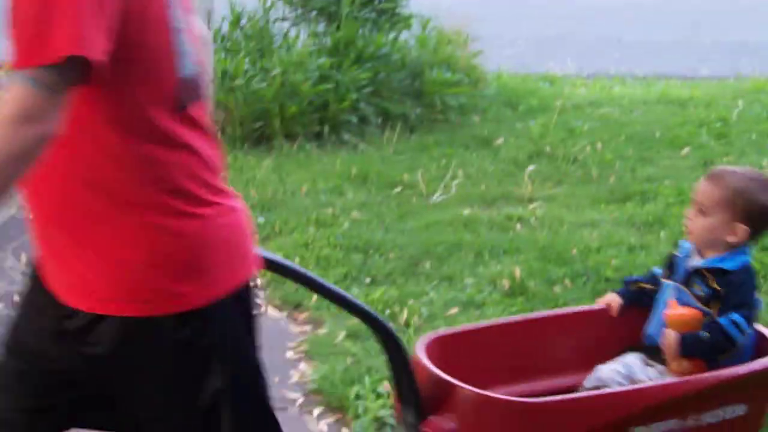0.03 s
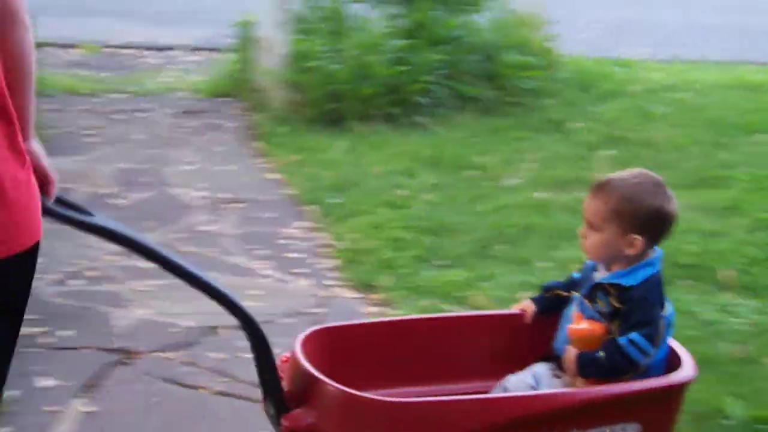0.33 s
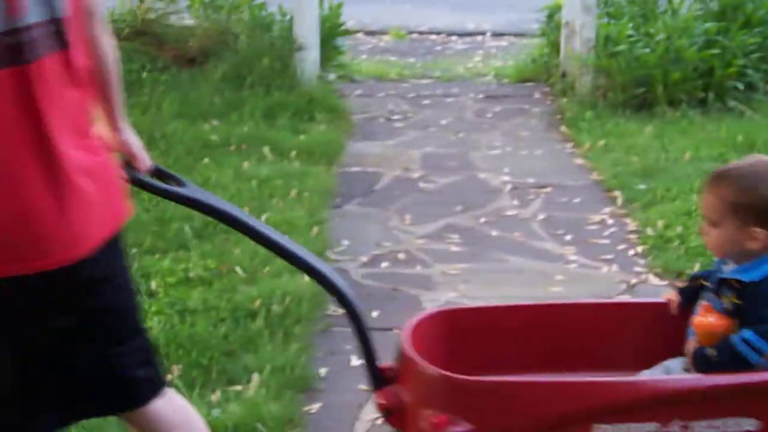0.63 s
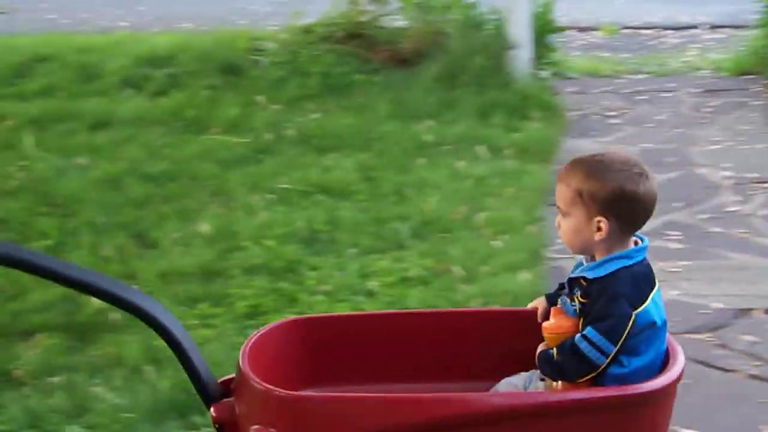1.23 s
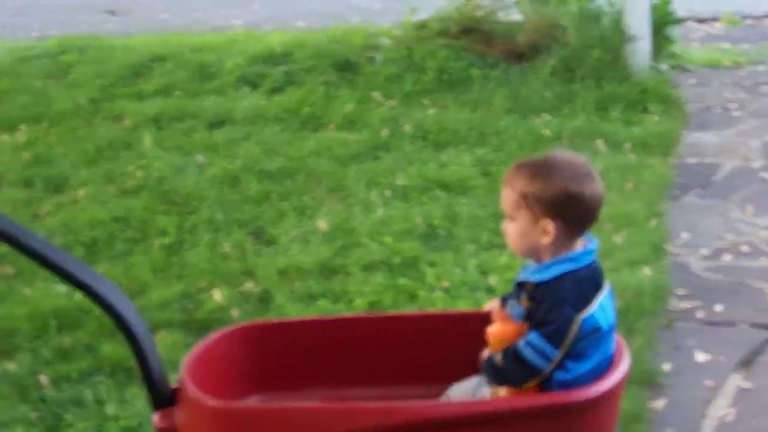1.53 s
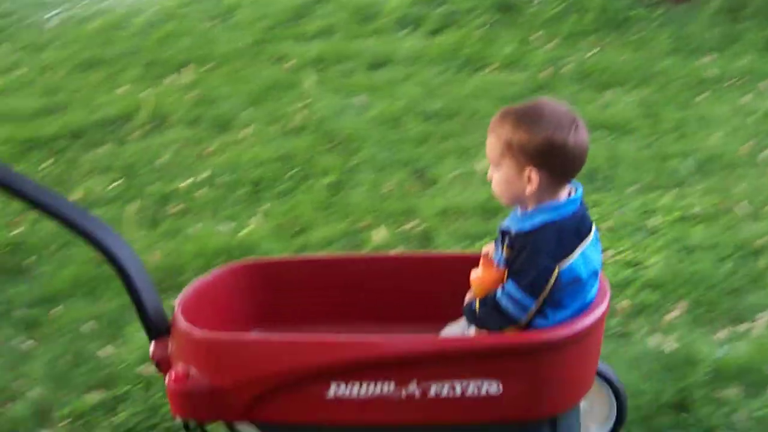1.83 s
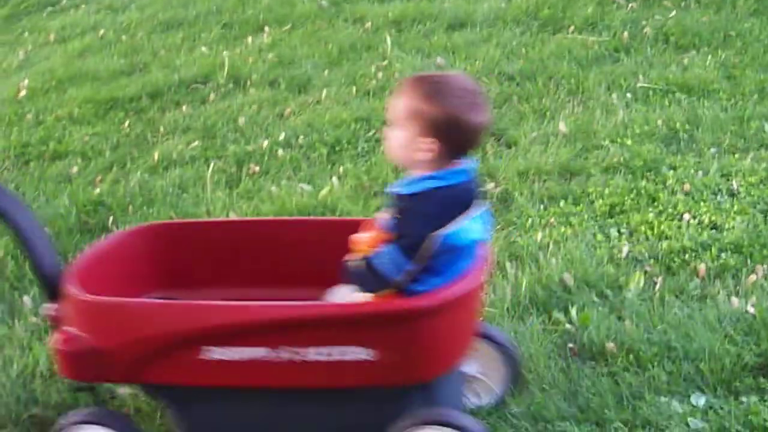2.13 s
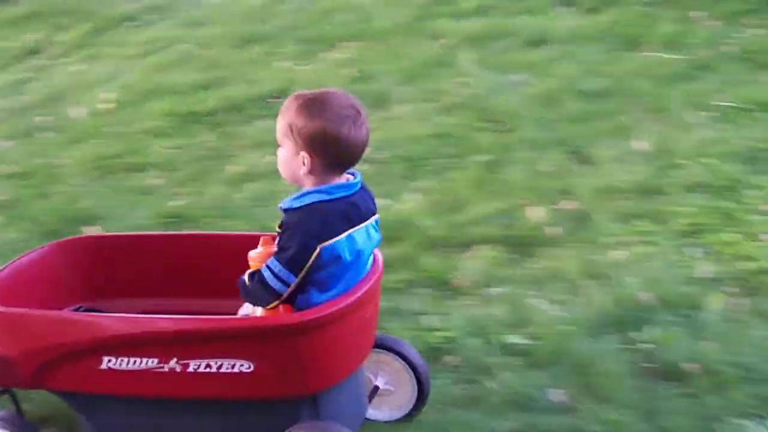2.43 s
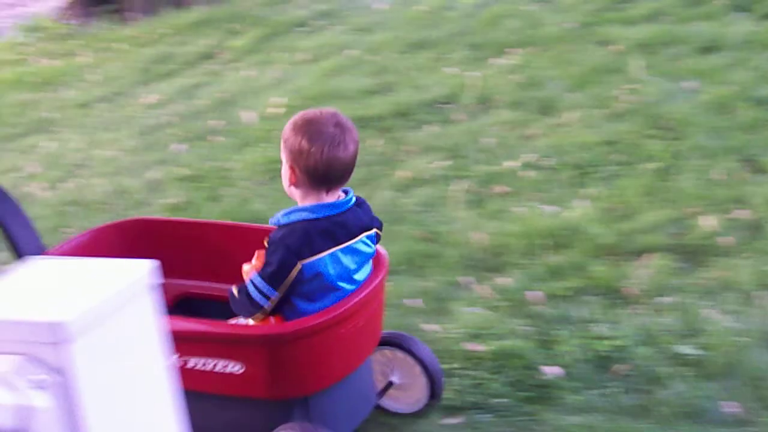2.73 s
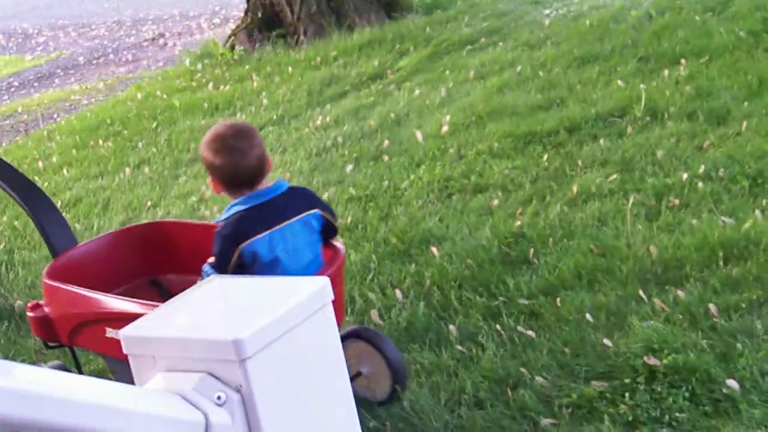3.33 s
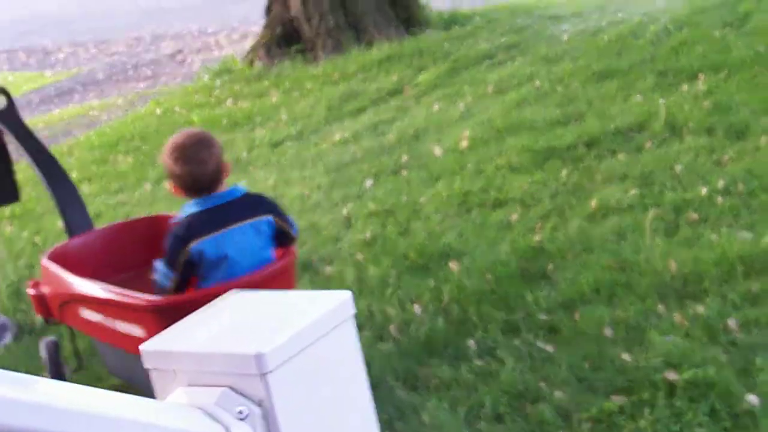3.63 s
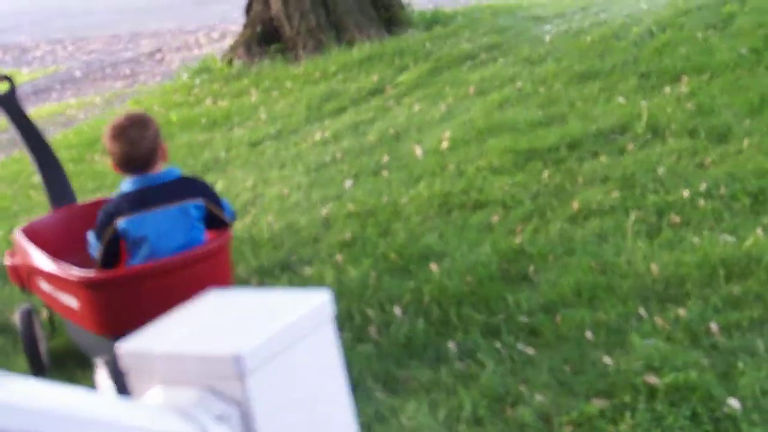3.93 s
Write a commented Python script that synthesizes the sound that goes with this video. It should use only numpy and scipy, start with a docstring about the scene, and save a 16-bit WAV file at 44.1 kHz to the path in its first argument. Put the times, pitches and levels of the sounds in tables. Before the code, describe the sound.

A plastic wagon rolls over stone and grass, rumbling, knocking and clacking.

```python
"""A plastic wagon with a child in it is pulled over flagstones, then lawn, past a near camera.
The ground jolts its wheels: the hollow tub booms and thuds, its walls rattle and knock,
loose joints clack, steel axle fittings jingle and a dry hub squeaks faintly.
Between jolts the wheels keep up a low, grainy rumble in the open air."""
import sys
import numpy as np
from scipy import signal
from scipy.fft import rfft, irfft, next_fast_len
from scipy.io import wavfile
from scipy.ndimage import uniform_filter1d, map_coordinates

SR = 44100
rng = np.random.default_rng(int(sys.argv[2]) if len(sys.argv) > 2 else 0)


def file_out(sig):
    """Save sig as 16-bit WAV at sys.argv[1]."""
    # one column per channel
    cols = np.atleast_2d(sig).T
    # limit, then scale
    lim = np.clip(cols, -1, 1)
    pcm = np.round(lim * 32767).astype(np.int16)
    wavfile.write(sys.argv[1], SR, pcm)


N = 176400

# Each row: start in seconds, length in seconds, tub, wall and joint levels in relative dB.
WHEEL_BUMPS = [(0.059,0.013,-32,-31,-53),(0.112,0.082,-26,-30,-64),(0.18,0.083,-33,-31.5,-37),(0.317,0.026,-28,-27.5,-33.5),(0.491,0.0073,-20,-32,-31.5),(0.506,0.039,-20.5,-30,-35.5),(0.564,0.026,-25.5,-31,-32.5),(0.707,0.043,-25,-32.5,-37),(0.776,0.051,-24,-35.5,-38),(0.906,0.058,-28.5,-30.5,-36),(1.07,0.072,-32.5,-39,-46),(1.356,0.078,-32.5,-38,-43.5),(1.538,0.057,-36,-39.5,-50),(1.692,0.1,-34,-39,-45.5),(1.847,0.075,-34.5,-38.5,-49),(1.905,0.062,-33,-37.5,-45),(2.02,0.076,-35.5,-44,-43),(2.271,0.035,-38,-34.5,-44),(2.429,0.026,-28,-33,-33),(2.601,0.041,-27.5,-29,-31),(2.692,0.018,-26,-34.5,-39),(2.824,0.024,-31.5,-29.5,-41),(2.872,0.032,-28,-34.5,-32),(2.929,0.027,-29,-33,-31.5),(2.98,0.025,-29.5,-30,-40),(3.153,0.053,-30.5,-37,-56),(3.441,0.05,-26.5,-32.5,-43),(3.565,0.042,-33.5,-32,-42.5),(3.844,0.04,-32.5,-39.5,-49.5)]
# Each row: time in seconds, tub, wall and joint levels in relative dB.
ROLLING_LEVELS = [(0,-26.5,-33,-34),(.3,-26.5,-33,-37.5),(.47,-30,-31.5,-40),(.62,-31.5,-36,-42),(.87,-34.5,-40.5,-49),(1.05,-34,-44,-51),(1.3,-37,-46,-52),(1.5,-37.5,-56.5,-54.5),(1.65,-43.5,-41.5,-50.5),(2.1,-38.5,-44,-56.5),(2.36,-39,-46.5,-60.5),(2.48,-33,-37,-48.5),(2.79,-40.5,-44.5,-48),(2.92,-30.5,-34,-42.5),(3.1,-34,-38.5,-44),(3.379,-36,-39.5,-47.5),(3.72,-42,-46,-57),(4,-42,-52,-58)]
def shaking(part, roll_db, bump_db, attack_s, release_s, sag_db):
    """Envelope of one part: steady rolling plus attack, sagging hold and release at each bump."""
    t = np.arange(N) / SR
    column = ("tub", "walls", "joints").index(part)
    roll = np.array(ROLLING_LEVELS)
    power = amp(np.interp(t, roll[:, 0], roll[:, 1 + column]) + roll_db) ** 2
    for start_s, length_s, *levels_db in WHEEL_BUMPS:
        age = t - start_s
        shape = np.clip(age / attack_s, 0, 1) * np.exp(-np.maximum(age - length_s, 0) / release_s)
        tilt_db = sag_db * (.5 - np.clip(age / length_s, 0, 1))
        power += (shape * amp(levels_db[column] + bump_db + tilt_db)) ** 2
    return np.sqrt(power)


# Each row: frequency in Hz, spectrum level in relative dB.
TUB_SPECTRUM = [(30,-42.5),(55,-24.5),(75,-23),(100,-9.5),(143,1),(170,-3.5),(210,-2.5),(255,-13),(295,-23.5),(450,-80.5)]
def tub_boom():
    """The hollow body booms under the knocks of the wheels."""
    hits = contacts(per_s=120, spread_db=5.9, life_s=0.0023, friction=1.0)
    boom = steadied(coloured(hits, lambda hz: along(TUB_SPECTRUM, hz)), samples=800)
    shake = shaking("tub", roll_db=-0.5, bump_db=-2, attack_s=0.0017, release_s=0.012, sag_db=0.7)
    return boom * shake * amp(1.3 * wobble(21.62))


# Each row: start in seconds, level in dB, pitch in Hz, t60 in seconds.
TUB_THUDS = [(0.196,-9,165.5,0.12),(0.509,-14.5,149.5,.27),(0.94,-23.5,199,0.063),(1.771,-20.5,191.4,0.17),(2.61,-23,221,0.23),(2.866,-15.5,142.6,0.12),(2.941,-17,196.4,0.15),(2.992,-21,210,0.13),(3.184,-16.5,159.3,0.094),(3.448,-21,159.8,0.16),(3.577,-27,248,0.143),(3.592,-20.5,154,0.15)]
# Each row: multiple of the pitch, level in relative dB.
THUD_PARTIALS = [(.72,-12.5),(1.001,0.5),(1.28,-7)]
def tub_thuds():
    """The tub drops on its axle."""
    return hollow_blows(TUB_THUDS, THUD_PARTIALS, attack_s=0.008)


# Each row: frequency in Hz, spectrum level in relative dB.
WALL_SPECTRUM = [(200,-49.5),(300,-18),(360,3),(470,1),(600,0.5),(740,1),(950,-4),(1250,-1.5),(1700,-9.5),(2400,-10.5),(4000,-61.5)]
# Each row: frequency in Hz, level in relative dB, t60 in seconds.
PLASTIC_MODES = [(423,2.5,0.031),(463,3.5,0.053),(561.5,-8,0.29),(654,5.5,0.063),(783,4.5,0.064),(866,-6,0.15),(1058,-4,0.082),(1256,-8.5,0.023),(1610,-2.5,0.031),(1770,-2.5,0.023),(2872,-4.5,0.039),(3260,-6.5,0.053)]
def wall_rattle():
    """Dense knocks rattle the plastic walls and wheels and ring their modes."""
    hits = contacts(per_s=170, spread_db=2.4, life_s=0.0032, friction=0.24)
    knocks = unit(coloured(hits, lambda hz: along(WALL_SPECTRUM, hz)))
    ring = amp(-3.5) * ringing(PLASTIC_MODES, per_mode_per_s=22, spread_db=5.2)
    shake = shaking("walls", roll_db=-1, bump_db=-1.5, attack_s=0.0013, release_s=0.025, sag_db=3.8)
    return steadied(knocks + ring, samples=1300) * shake * amp(1.6 * wobble(25.37))


# Each row: start in seconds, level in dB, pitch in Hz, t60 in seconds.
PANEL_KNOCKS = [(1.387,-31,557,.12),(1.927,-30.5,1163,0.046),(2.374,-33,1195,0.047),(2.691,-25.5,646,0.048),(2.869,-20,553,0.051),(2.934,-21.5,1234,0.064),(2.9915,-22.5,650,0.023),(3.161,-29,794,0.16),(3.4475,-27.5,1037,0.064),(3.7025,-25.5,1070,0.01)]
# Each row: multiple of the pitch, level in relative dB.
KNOCK_PARTIALS = [(.7,-2),(1,4),(1.36,1),(1.5,-10)]
def panel_knocks():
    """A hollow panel is knocked and rings briefly."""
    return hollow_blows(PANEL_KNOCKS, KNOCK_PARTIALS, attack_s=0.00066)


# Each row: start in seconds, level in relative dB, centre in Hz, crack t60 in seconds.
JOINT_CLACKS = [(0.115,-19,4800,0.011),(0.1541,-20.5,3980,0.016),(0.195,-11,5340,0.0053),(0.21,-9,4340,0.02),(0.2971,-21,2900,0.0062),(0.3427,-13,3970,0.0089),(0.4,-26.5,1530,0.034),(0.4792,-23.5,1500,0.019),(0.502,-23.5,3660,0.024),(0.563,-25,3330,0.028),(0.696,-20,3910,0.024),(0.943,-23.5,2490,0.035),(1.0413,-32.5,2700,0.0051),(1.2257,-27,2770,0.012),(1.25,-36.5,4460,0.018),(1.384,-31,2960,0.016),(1.5917,-22,2890,0.0072),(1.6677,-29,2320,0.027),(1.7591,-27,7160,0.0061),(1.9273,-29.5,6130,0.023),(2.0236,-26.5,5340,0.0079),(2.214,-34.5,2400,0.022),(2.2845,-31.5,2500,.011),(2.422,-29,1490,0.015),(2.4394,-24.5,2470,0.019),(2.629,-19.5,3110,0.01),(2.6889,-22.5,2930,0.018),(2.8511,-19.5,4110,0.024),(2.8663,-18,3290,0.017),(2.933,-19,1744,0.013),(2.991,-21.5,2300,0.0078),(3.043,-25.5,2040,0.046),(3.121,-29.5,2250,0.0064),(3.161,-26,1510,0.013),(3.2231,-29.5,1820,0.035),(3.31,-30,1330,0.025),(3.4454,-24,2430,0.019),(3.4474,-21,630,0.013),(3.5747,-25,760,0.0061)]
# Each row: frequency in Hz, spectrum level in relative dB.
CRACK_SPECTRUM = [(200,-42),(400,7),(900,4.5),(3000,4),(4800,3.5),(6300,4),(7200,-2.5),(8000,-19),(8800,-56.5)]
def joint_clacks(spot_db=14.5, spot_octaves=1.54, spot_t60_s=0.035, tail_db=-19.5, tail_t60_s=0.24):
    """A loose joint hits its stop: a crack and the plastic's modes, coloured by the spot that is hit."""
    out, t = np.zeros((2, N + SR)), np.arange(SR // 6) / SR
    for start_s, db, centre_hz, t60 in JOINT_CLACKS:
        spot = lambda hz: spot_db * np.exp(-(np.log2((hz + 1) / centre_hz) / spot_octaves) ** 2)
        shape = (amp(-60 * t / t60) + amp(tail_db - 60 * t / tail_t60_s)) * rise(t, 0.0003)
        burst = shape * rng.standard_normal((2, len(t)))
        crack = coloured(burst, lambda hz: along(CRACK_SPECTRUM, hz) + spot(hz))
        crack *= np.linalg.norm(shape) / np.linalg.norm(crack, axis=1, keepdims=True)
        ring = amp(-11.5) * struck(PLASTIC_MODES, t, spot) * rise(t, 0.00027)
        ring += amp(-7) * struck([(centre_hz, 0, spot_t60_s)], t, spot) * rise(t, 0.00069)
        out[:, int(start_s * SR):][:, :len(t)] += amp(db) * (crack + ring)
    return out[:, :N]


# Each row: frequency in Hz, spectrum level in relative dB.
JOINT_SPECTRUM = [(800,-16),(1500,-3),(2100,-0.5),(2900,4),(3700,-1),(4300,0),(4800,-4.5),(5500,5),(6200,-9.5),(7000,-4),(7600,-13.5),(8100,-36.5),(8800,-25.5)]
# Each row: frequency in Hz, level in relative dB, t60 in seconds.
STEEL_MODES = [(2710,-9.5,0.058),(3370,-12,0.059),(4010,-5.5,0.087),(4560,-3,0.027),(5300,-17,0.048),(5230,0,0.052),(5300,-2,0.034),(7300,-6,0.076)]
def joint_chatter():
    """Hubs and handle chatter, and the steel fittings jingle with them."""
    hits = contacts(per_s=180, spread_db=5.7, life_s=0.0017, friction=0.49)
    chatter = steadied(coloured(hits, lambda hz: along(JOINT_SPECTRUM, hz)), samples=1500)
    jingle = steadied(ringing(STEEL_MODES, per_mode_per_s=17, spread_db=1.6), samples=5000)
    shake = shaking("joints", roll_db=0, bump_db=-2, attack_s=0.0032, release_s=0.019, sag_db=2.1)
    return (patchy(chatter, depth_db=4.0) + amp(-9) * jingle) * shake


# Each row: start in seconds, level in relative dB.
WASHER_PINGS = [(0.113,-28),(0.183,-28),(0.272,-31),(0.49,-31),(0.748,-26),(1.755,-37),(2.062,-37),(2.098,-30),(2.615,-31),(2.819,-37),(3.16,-38),(3.876,-41)]
def washer_pings(pitch_hz=5400, t60_s=0.11):
    """A washer rings now and then on one slightly unsteady tone."""
    t, out = np.arange(N) / SR, np.zeros(N)
    for start_s, db in WASHER_PINGS:
        age = np.maximum(t - start_s, 0)
        hz = pitch_hz * (1 + 0.0015 * wobble(150))
        out += amp(db - 60 * age / t60_s) * rise(age, 0.0013) * np.sin(2 * np.pi * np.cumsum(hz) / SR)
    return out


# Each row: start in seconds, length in seconds, pitch in Hz, level in relative dB.
HUB_SQUEAKS = [(0.72,0.2,2930,-46),(1.925,0.07,6650,-45),(2.72,0.11,3200,-47)]
def hub_squeaks(sag_per_s=0.12, waver=0.005):
    """A dry hub gives faint, slightly falling squeaks."""
    t, out = np.arange(N) / SR, np.zeros(N)
    for start_s, length_s, pitch_hz, db in HUB_SQUEAKS:
        age = t - start_s
        hz = pitch_hz * (1 - sag_per_s * age + waver * wobble(140))
        swell = np.sqrt(np.abs(np.sin(np.pi * np.clip(age / length_s, 0, 1))))
        out += amp(db) * swell * np.sin(2 * np.pi * np.cumsum(hz) / SR)
    return out


# Each row: frequency in Hz, spectrum level in relative dB.
AIR_SPECTRUM = [(20,-16.5),(31,-7),(46,-3.5),(80,1.5),(150,-2),(300,-18),(600,-20),(1200,-25),(3000,-20.5),(6500,-27),(7600,-39.5),(8700,-53)]
def outdoor_air():
    """Low outdoor rumble and faint hiss."""
    gain = amp(-42 + 1.4 * wobble(3.85))
    return gain * unit(coloured(rng.standard_normal((2, N)), lambda hz: along(AIR_SPECTRUM, hz)))


# Each row: frequency in Hz, left minus right in dB.
MIC_BALANCE = [(60,11),(150,6),(360,5.5),(880,1.5),(1370,-1),(2140,1),(3350,1),(5230,-8.5),(8180,-11)]
# Each row: frequency in Hz, left-right coherence from 0 to 1.
MIC_COHERENCE = [(40,0.69),(120,0.94),(600,0.85),(1200,0.64),(2200,0.47),(4000,0.11),(8000,0.086)]
def microphones(pair, left_lag_s=0.000052):
    """Two close ports: alike in the bass, loosely related in the treble, the right slightly earlier."""
    size = next_fast_len(N + SR // 8)
    hz = np.fft.rfftfreq(size, 1 / SR)
    angle = np.arccos(np.clip(along(MIC_COHERENCE, hz), 0, 1)) / 2
    mid, side = rfft(pair, size) * [np.cos(angle), np.sin(angle)]
    lean = amp(along(MIC_BALANCE, hz) / 2)
    lag = np.exp(-1j * np.pi * hz * left_lag_s)
    ports = np.array([(mid + side) * lean * lag, (mid - side) / lean / lag])
    return irfft(ports * 2 / (lean + 1 / lean), size)[:, :N]


def contacts(per_s, spread_db, life_s, friction):
    """Random tiny impacts, each a short burst, on a bed of friction; two channels share the timing."""
    hits = (rng.random(N) < per_s / SR) * amp(spread_db * np.clip(rng.standard_normal(N), -2, 2))
    power = signal.lfilter([1], [1, -np.exp(-1 / (life_s * SR))], hits ** 2)
    return np.sqrt(power / power.mean() + friction) * rng.standard_normal((2, N))


def hollow_blows(blows, partials, attack_s):
    """Blows on hollow plastic: a few partials on a pitch that depends on the spot that is hit."""
    out, t = np.zeros((2, N + SR)), np.arange(SR // 4) / SR
    for start_s, db, pitch_hz, t60 in blows:
        ring = struck([(ratio * pitch_hz, level, t60) for ratio, level in partials], t, lambda hz: 0)
        out[:, int(start_s * SR):][:, :len(t)] += amp(db) * ring * rise(t, attack_s)
    return out[:, :N]


def struck(modes, t, colour_db, scatter_db=2.5):
    """Modes set ringing at once, each at a random level and phase; starts near rms 1."""
    gains = [amp(db + colour_db(hz) + rng.normal(0, scatter_db)) for hz, db, _ in modes]
    ring = sum(gain * damped_sine(t, hz, t60) for gain, (hz, _, t60) in zip(gains, modes))
    return ring * np.sqrt(2) / np.linalg.norm(gains)


def ringing(modes, per_mode_per_s, spread_db):
    """Small knocks land on different spots, so that each rings one of the modes."""
    t, out = np.arange(SR // 5) / SR, np.zeros((2, N))
    for hz, db, t60 in modes:
        knocks = (rng.random(N) < per_mode_per_s / SR) * amp(spread_db * rng.uniform(-0.92, 0.93, N))
        ring = amp(db) * damped_sine(t, hz, t60) * rise(t, 1 / hz)
        out += signal.oaconvolve(knocks[None], ring, axes=1)[:, :N]
    return unit(out)


def damped_sine(t, hz, t60):
    """One decaying mode, at a random phase in each of two channels."""
    return amp(-60 * t / t60) * np.sin(2 * np.pi * (hz * t + rng.random((2, 1))))


def patchy(x, depth_db):
    """Random gain over frequency and time: the colour changes from one contact to the next."""
    spectra = signal.stft(x, nperseg=1024)[2]
    field = uniform_filter1d(rng.standard_normal(spectra.shape[1:]), size=4, axis=0)
    field = unit(uniform_filter1d(field, size=3, axis=1))
    return unit(signal.istft(spectra * amp(depth_db * field), nperseg=1024)[1][:, :N])


def coloured(x, db_of):
    """x through a minimum-phase filter whose gain in dB is db_of(Hz)."""
    size = 2 * next_fast_len(x.shape[-1] // 2 + SR // 8)
    cepstrum = irfft(db_of(np.fft.rfftfreq(size, 1 / SR)) * np.log(10) / 20, size)
    cepstrum[1:size // 2] *= 2
    cepstrum[size // 2 + 1:] = 0
    return irfft(rfft(x, size) * np.exp(rfft(cepstrum)), size)[..., :x.shape[-1]]


def steadied(x, samples):
    """x held near rms 1 over a sliding window."""
    power = uniform_filter1d(uniform_filter1d(x[0] ** 2, samples), samples)
    return x / np.sqrt(np.abs(power) + 1e-3 * np.mean(x ** 2))


def wobble(knots_per_s):
    """A smooth random curve."""
    return map_coordinates(rng.standard_normal(2048), [np.arange(N) * knots_per_s / SR], mode="wrap")


def along(points, hz):
    """(Hz, value) points interpolated on a log axis."""
    knots_hz, values = np.transpose(points)
    return np.interp(np.log(hz + 1), np.log(knots_hz + 1), values)


def rise(t, attack_s):
    """Exponential onset from 0 to 1."""
    return 1 - np.exp(-t / attack_s)


def amp(db):
    """Decibels to gain."""
    return 10 ** (np.asarray(db) / 20)


def unit(x):
    """Scaled to rms 1."""
    return x / np.sqrt(np.mean(x ** 2) + 1e-20)


def scene():
    """The wagon in the open air."""
    body = tub_boom() + wall_rattle() + tub_thuds() + panel_knocks()
    joints = joint_chatter() + joint_clacks()
    axles = (washer_pings() + hub_squeaks()) * np.array([[1], [.5]])
    return microphones(body + amp(2) * (joints + axles) + outdoor_air())


def record(dry):
    """The camera clips at full scale and keeps nothing above its band limit."""
    size, top_hz = next_fast_len(N + SR // 8), 8780
    passband = np.fft.rfftfreq(size, 1 / SR) < top_hz
    return irfft(rfft(np.clip(dry, -1, 1), size) * passband, size)[:, :N]


dry = scene()
out = record(dry)
file_out(out)
```